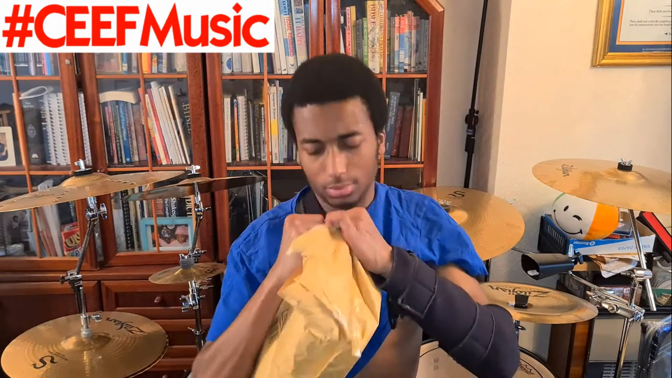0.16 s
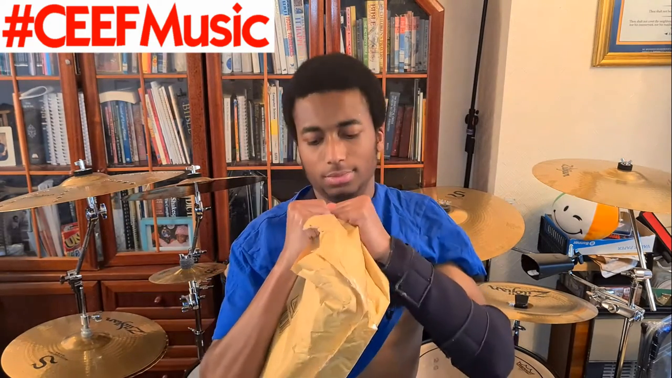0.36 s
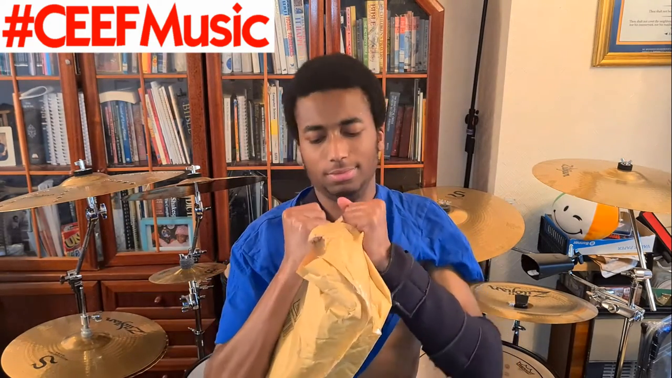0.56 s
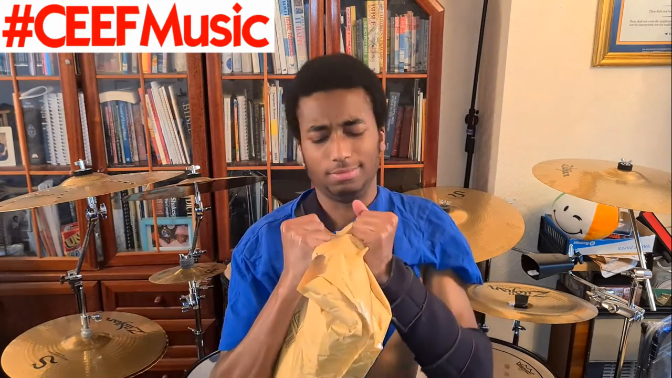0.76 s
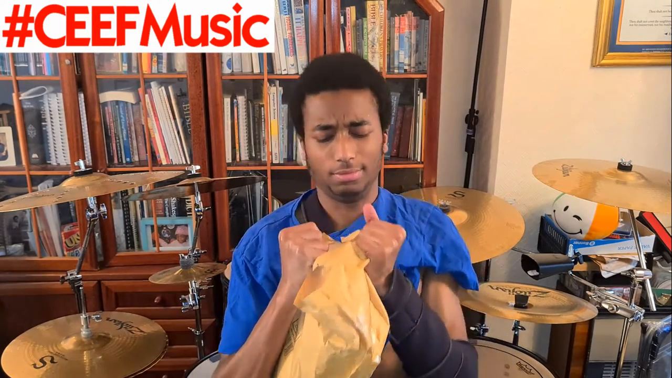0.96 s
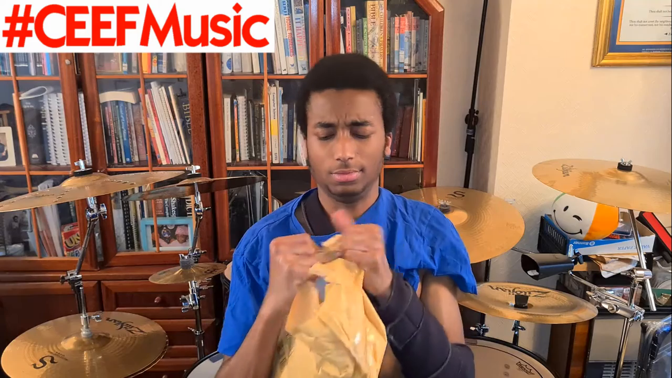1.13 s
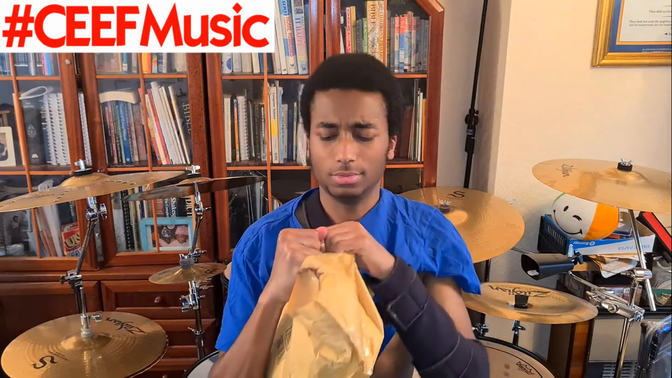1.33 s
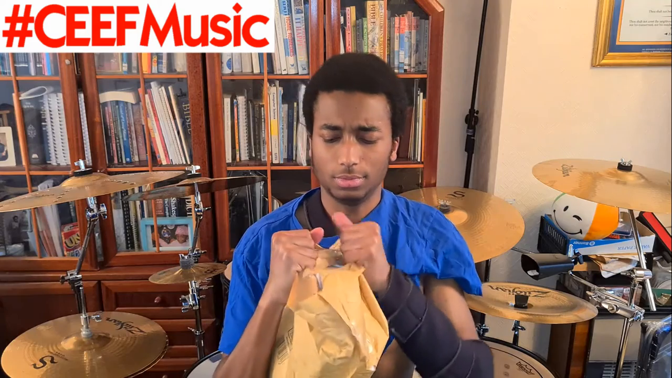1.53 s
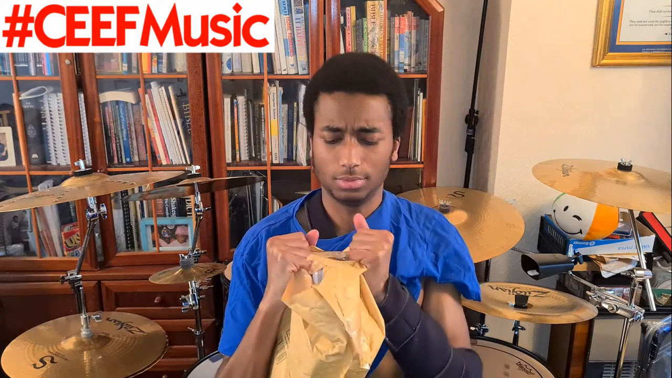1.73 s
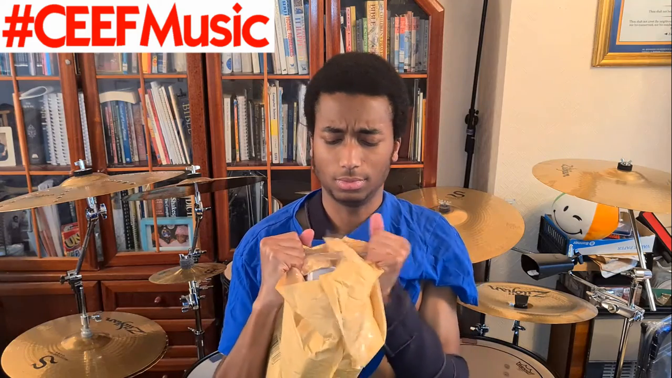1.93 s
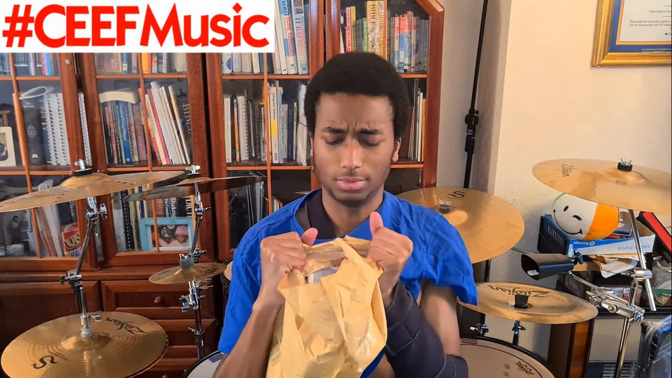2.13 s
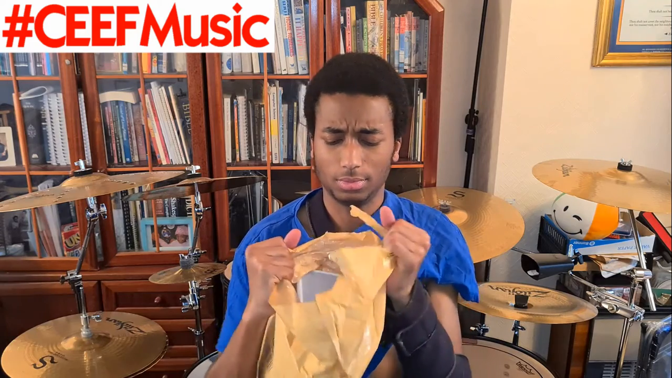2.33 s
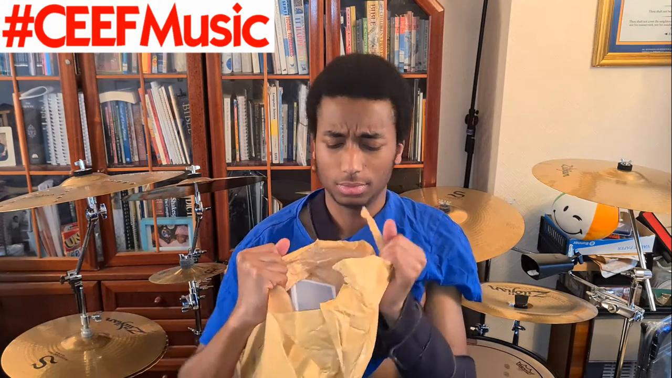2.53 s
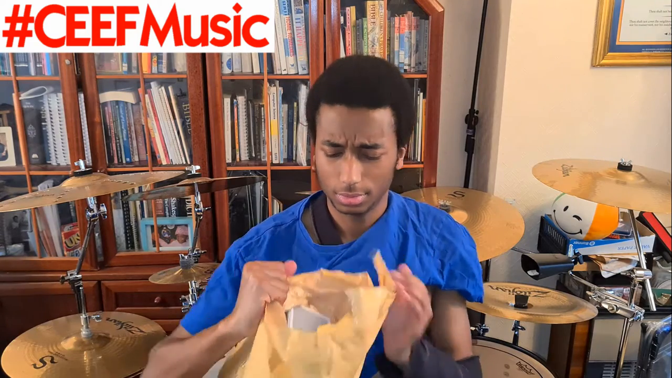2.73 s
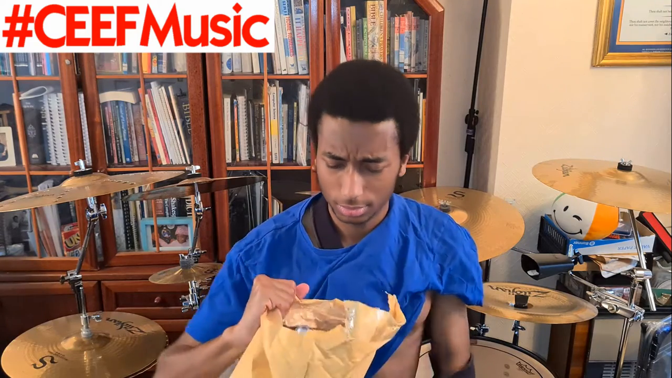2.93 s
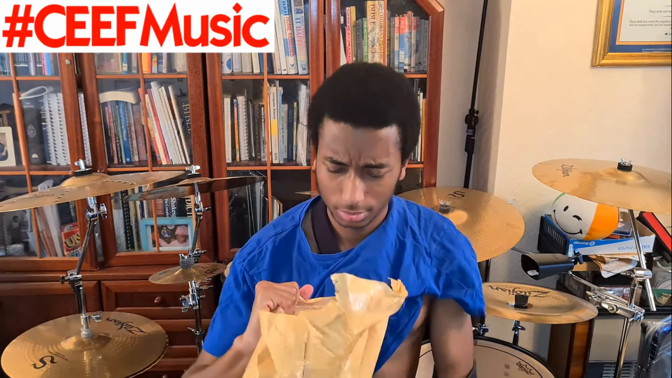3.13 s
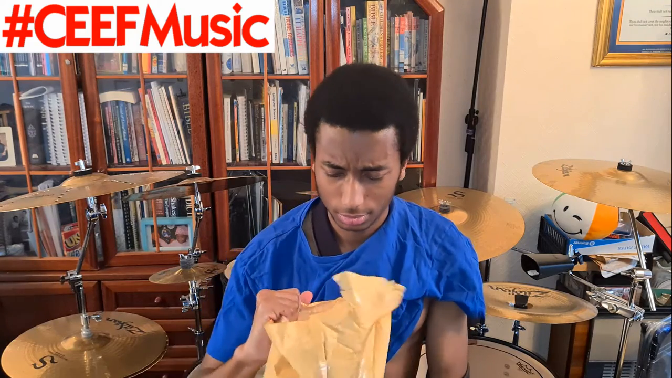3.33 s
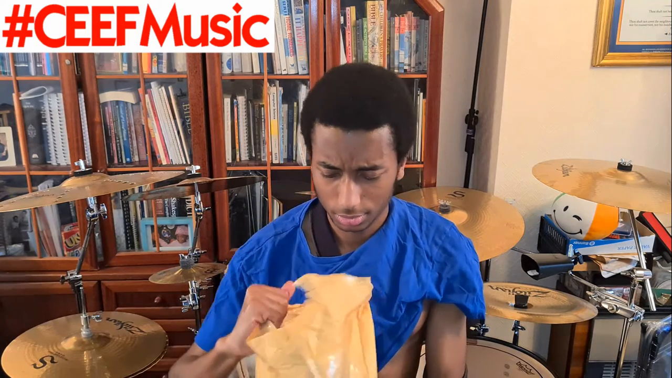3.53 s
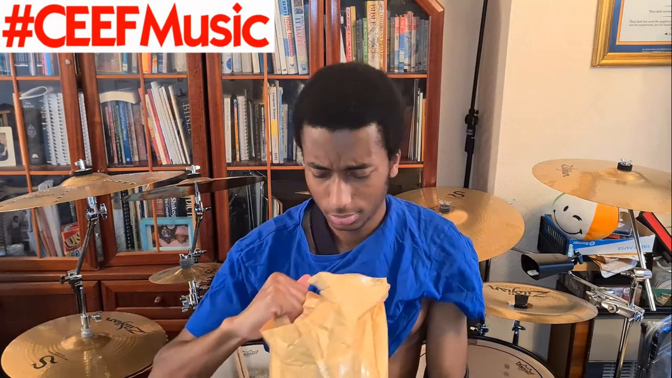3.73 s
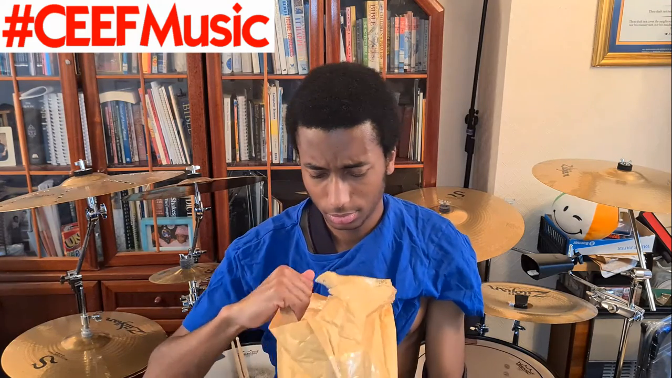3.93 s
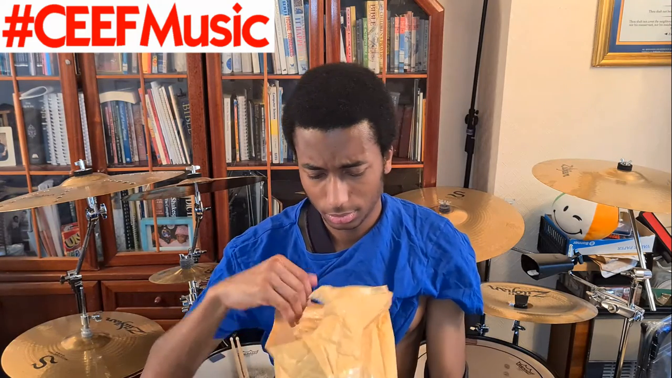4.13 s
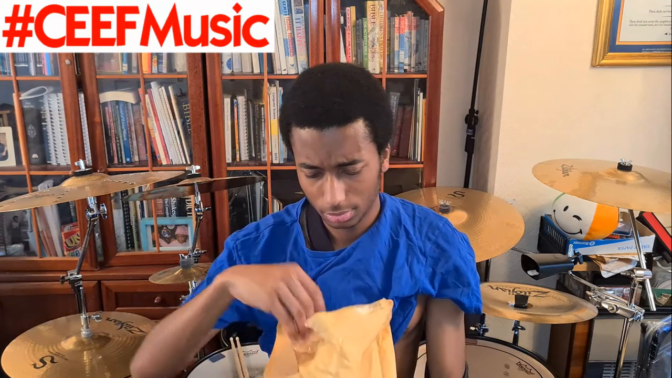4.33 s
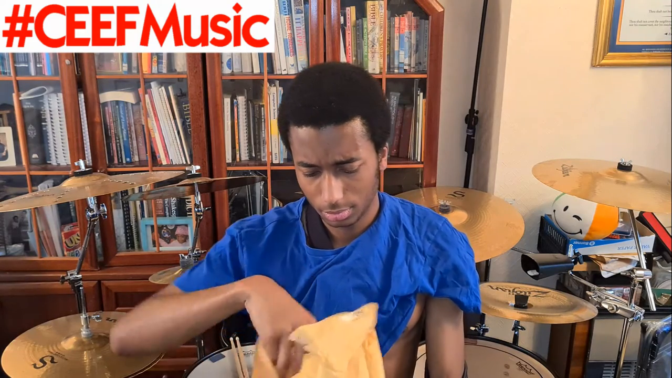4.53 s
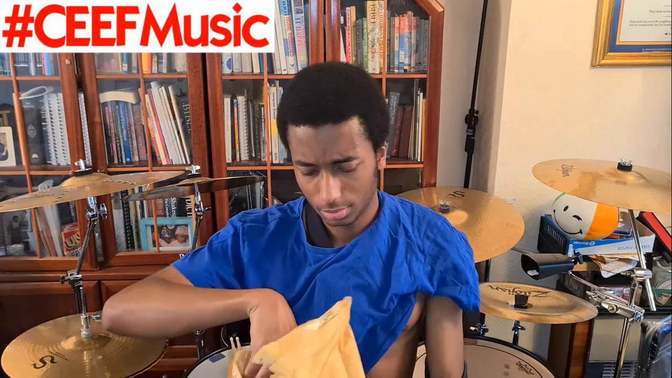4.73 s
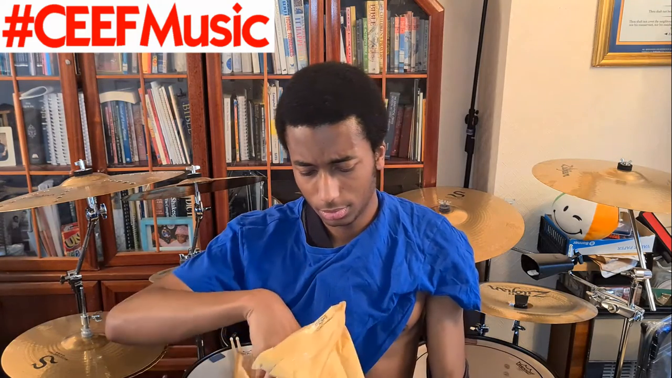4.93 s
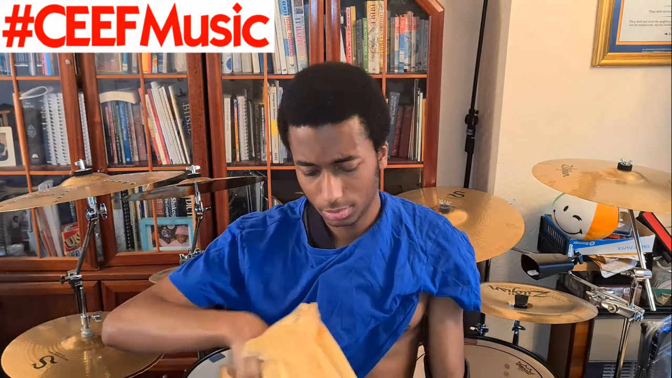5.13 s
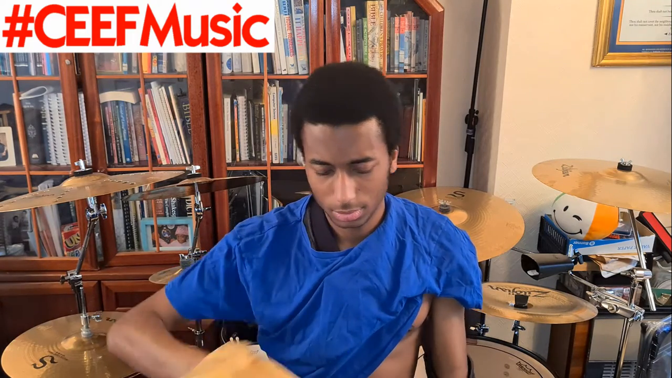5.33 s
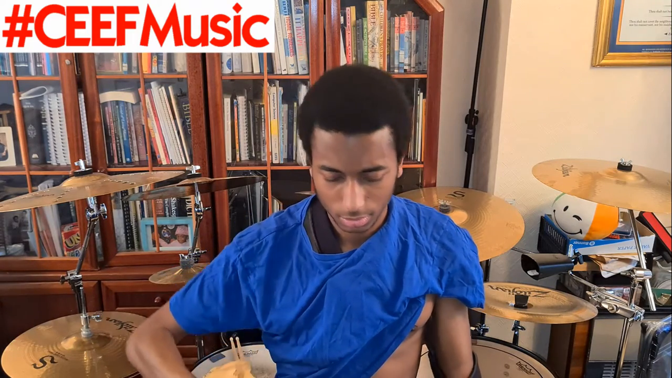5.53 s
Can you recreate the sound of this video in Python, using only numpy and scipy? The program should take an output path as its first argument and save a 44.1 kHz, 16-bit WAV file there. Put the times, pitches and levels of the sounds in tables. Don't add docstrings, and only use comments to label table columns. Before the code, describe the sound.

A padded paper envelope is torn open by hand in a damped, furnished room, heard in stereo from about a metre. The first 0.17 seconds are nearly silent, then the sound cuts in abruptly with crisp crinkling. From 0.2 to 1.0 seconds, tugs bring dense crackle, woody creases popping, fibre hiss and dull hollow thuds. After a short lull, harder pulls come around 1.2, 1.45 and 1.6 seconds, leading to the loudest ripping crack at about 1.94. Another strong burst follows at 2.2 to 2.4 as the bag opens, with a smaller one at 2.65. It goes almost quiet near 3 seconds. Looser rustles and small pops return from 3.2 to 3.8, then very faint rummaging, with a soft crinkle around 4.5 to 4.8. After near-quiet, a duller, low papery shuffle stirs from 5.3 to the end. Faint room hiss and low rumble lie underneath.

```python
import sys
import numpy as np
from scipy import signal
from scipy.fft import rfft, irfft, next_fast_len
from scipy.io import wavfile
from scipy.ndimage import uniform_filter1d

SR = 44100
rng = np.random.default_rng(int(sys.argv[2]) if len(sys.argv) > 2 else 0)


def transcribe(u):
    v = np.clip(np.atleast_2d(u).T, -1, 1)
    q = np.round(v * 32767).astype(np.int16)
    wavfile.write(sys.argv[1], SR, q)


def volts(x):
    e = np.asarray(x, float) / 20
    return 10 ** e


N = 246078
EVENT_N = 5000


def rms_one(x):
    return x / np.sqrt(np.mean(x ** 2) + 1e-20)


def drift(rate):
    knots = rng.standard_normal(200)
    return np.interp(np.arange(N) / SR * rate, np.arange(200), knots)


def colour(x, points, share=1):
    size = next_fast_len(N + 4096)
    hz, db = np.transpose(points)
    bin_hz = np.arange(size // 2 + 1) * SR / size
    gain = volts(share * np.interp(np.log(bin_hz + 1), np.log(hz), db))
    return irfft(rfft(x, size) * gain, size)[..., :N]


def band(x, low_hz, high_hz, order=2):
    return signal.sosfilt(signal.butter(order, [low_hz, high_hz], "band", fs=SR, output="sos"), x)


def peak_filter(hz, width):
    r = np.exp(-np.pi * width / SR)
    zeros = np.array([1, 0, -1]) * (1 - r * r) / 2
    return zeros, [1, -2 * r * np.cos(2 * np.pi * hz / SR), r * r]


def resonance(x, hz, width):
    return signal.lfilter(*peak_filter(hz, width), x)


def wandering(x, hz, width, size=256):
    out, state = np.zeros_like(x), np.zeros((2, 2))
    for i in range(0, N, size):
        zeros, poles = peak_filter(hz[i], width)
        out[:, i:i + size], state = signal.lfilter(zeros, poles, x[:, i:i + size], zi=state)
    return out


def buckles(per_s, spread_db, t60):
    struck = rng.random(N) < per_s / SR
    sizes = volts(2 * spread_db * np.minimum(rng.exponential(1, N), 4)) * struck
    power = signal.lfilter([1], [1, -volts(-120 / (t60 * SR))], sizes + 1e-9)
    return np.sqrt(power / uniform_filter1d(power, size=3000))


def swell(s, rise, fall):
    t = np.arange(0, N + 16, 16) / SR - s
    times = np.where(t < 0, -t / max(rise, .005), t / max(fall, .005))
    return np.repeat(volts(-40 * times), 16)[:N]


def kicks(table, click):
    noise = rng.standard_normal((len(table), 2, EVENT_N))
    noise[:, :, 0] = click * np.sign(noise[:, :, 0])
    return noise


def add(out, s, peak_db, sound):
    at = round(s * SR)
    out[:, at:at + EVENT_N] += volts(peak_db) * sound / np.abs(sound[0]).max()


def empty_events():
    return np.zeros((2, N + EVENT_N)), np.arange(EVENT_N) / SR


def handling():
    # over_sheet_db, share of the fibre level it follows
    layers = [(-6.5, -0.33), (-1, 0.0), (-5, 0.7579), (0, 1.0)]
    # time_s, sheet_db, fibre_share_db
    holding = [(0.17, -48.5, 7.5), (0.3, -45.5, -1.5), (0.9, -63, 1), (1.095, -80, -2), (1.35, -55, -7),
               (1.75, -49.5, 6.5), (2.07, -60.5, 7.5), (2.17, -57, 7.5), (2.55, -54, 4), (2.77, -60.5, 4),
               (3.14, -84, 4.5), (3.3, -47, -7.5), (3.72, -64, 5), (3.91, -63.5, 9), (4.12, -66, 9),
               (4.33, -69.5, 13), (4.85, -70.5, 12.5), (5.0, -75.5, 6.5), (5.29, -72, 6)]
    # peak_s, sheet_db, fibre_share_db,
    # rise_s, fall_s
    grips = [(0.171, -41.5, 7, .005, 0.067), (0.205, -32, -10, 0.027, 0.038),
             (0.381, -34, -4.5, 0.057, 0.34), (0.46, -37, 4, 0.062, 0.36), (0.5, -35.5, 6, 0.045, 0.15),
             (0.6, -37.5, -13, 0.12, 0.1), (0.665, -31.5, -3, 0.0094, 0.5), (0.75, -31, 3, 0.15, 0.11),
             (0.868, -41, 5.5, 0.031, 0.086), (0.936, -48, 11.5, 0.013, 0.13),
             (1.12, -41.5, -0.5, 0.026, 1), (1.201, -37, -0.5, 0.11, 0.17), (1.27, -46.5, -1, 0.23, 0.15),
             (1.409, -33.5, -3, 0.026, 0.14), (1.469, -28, -4.5, 0.065, 0.069),
             (1.572, -34, -3.5, 0.016, 0.033), (1.6, -44.5, 2.5, 0.024, 0.096),
             (1.651, -47, -5, 0.027, 0.14), (1.779, -38, 2.5, 0.032, 0.092), (1.871, -41, 14, 0.006, 0.074),
             (1.917, -35.5, -1.5, 0.035, 0.11), (1.942, -24.5, -3.5, 0.058, 0.086),
             (2.21, -42.5, 9.5, 0.05, 0.21), (2.274, -28, -1, 0.087, 0.042),
               (2.365, -36.5, -3.5, 0.018, 0.087), (2.48, -49, -6, 0.09, 0.21),
               (2.644, -37, -3, 0.072, 0.094), (2.97, -60.5, 9, 0.24, 0.26), (3.17, -54.5, 4, .015, 0.21),
               (3.209, -39, -11, 0.021, 0.083), (3.44, -45, -1.5, 0.27, 0.39),
               (3.59, -38.5, 1.5, 0.14, 0.13), (4.032, -47.5, -5, 0.06, 0.034), (4.4, -65, 15, 0.014, 0.51),
               (4.548, -42, -3.5, 0.038, 0.19), (4.65, -46.5, 4.5, 0.09, 0.2),
               (4.79, -51.5, 1, 0.035, 0.089), (5.356, -47, -3.5, 0.03, 0.18), (5.39, -38, -22, 0.09, 0.16),
               (5.47, -39.5, -14, 0.035, 0.24), (5.58, -39, -20, 0.096, .1)]
    held_s, *held_levels = np.transpose(holding)
    held_db, held_fibre_db = [np.interp(np.arange(N) / SR, held_s, level) for level in held_levels]
    moves = grips
    swells = np.array([swell(s, rise, fall) for s, db, fibre_db, rise, fall in moves])
    db, fibre_db = np.array(moves)[:, 1:3].T
    gains = []
    for over_db, share in layers:
        held_power = volts(held_db + share * held_fibre_db) ** 2
        moved_power = volts(db + share * fibre_db) ** 2 @ swells
        gains.append(volts(over_db) * np.sqrt(held_power + moved_power))
    return gains


def rustle():
    # pitch_hz, width_hz, level_db
    panels = [(307, 6.9, -17), (620, 460, -6), (1090, 400, -10), (1790, 100, -3.5), (2156, 61, -4),
              (2930, 51, -8.5)]
    # frequency_hz, density_db (per Hz)
    paper_colour = [(71, -57.5), (120, -10), (300, -9), (392, -11.5), (639, -6), (867, -14), (1090, -5),
                    (1500, -6), (1740, -3), (2000, -8), (3840, -4.5), (8520, -6.5), (15700, 3)]
    edges_hz = [130, 800, 2450, 7800, 19000]
    coarse = buckles(per_s=200, spread_db=4.0, t60=0.052)
    fine = buckles(per_s=660, spread_db=4.0, t60=0.13)
    noise = colour(rng.standard_normal((2, N)), paper_colour)
    ringing = 0
    for hz, width, db in panels:
        fold = np.tanh(drift(rate=16))
        pitch_hz = hz * (1 + .05 * fold[::-1])
        ringing = ringing + volts(db + 12.0 * fold) * wandering(noise * (0.43 + coarse), pitch_hz, width)
    out = 0
    for k, gain in enumerate(handling()):
        fine_share = [.1, .3, .6, .8][k]
        shaken = noise * (1.37 + (1 - fine_share) * coarse + fine_share * fine)
        shaken = shaken + 3.96 * ringing
        layer = band(shaken, edges_hz[k], edges_hz[k + 1], order=3)
        out = out + volts(-1.5) * gain * layer / np.std(layer[0])
    return out


def snaps():
    # start_s, peak_db, pitch_hz, crack_db (under the peak)
    tearing = [(0.203, -18, 920, -39), (0.233, -29, 1110, -27), (0.272, -22, 670, -21.5),
               (0.325, -23, 1670, -14.5), (0.374, -18, 1510, -13.5), (0.388, -12, 1090, -23),
               (0.423, -17, 2170, -32), (0.443, -23.5, 600, -9), (0.475, -19, 1960, -28),
               (0.492, -16, 1110, -32), (0.508, -13.5, 1810, -45), (0.569, -24.5, 665, -49),
               (0.599, -22, 1790, -23.5), (0.664, -14, 1670, -10), (0.702, -14, 1090, -14.5),
               (0.727, -24.5, 1110, -7), (0.74, -15, 1040, -16.5), (0.773, -11, 1210, -15.5),
               (0.873, -17, 1710, -15), (0.932, -16, 1620, -16.5)]
    # start_s, peak_db, pitch_hz, crack_db
    pulling = [(1.11, -42.5, 2240, -5), (1.137, -20, 1810, -55), (1.174, -18, 1790, -14),
               (1.195, -16, 1790, -8), (1.236, -24, 1790, -29), (1.328, -24.5, 1900, -31),
               (1.387, -36, 1130, -9), (1.401, -29, 1090, -12.5), (1.448, -14, 1720, -24),
               (1.456, -23, 633, -7), (1.465, -14, 2380, -10), (1.567, -13, 1790, -33),
               (1.588, -18.5, 1290, -8.5), (1.632, -25, 2530, -12), (1.649, -14.5, 2320, -17.5),
               (1.688, -17, 629, -32), (1.731, -38.5, 756, -26.5), (1.768, -28, 700, -25.5),
               (1.775, -23.5, 1884, -10), (1.796, -29, 1319, -9), (1.869, -16, 1720, -31.5),
               (1.914, -24, 2160, -7.5), (1.935, -8.5, 1790, -24), (1.949, -12, 1810, -13.5)]
    # start_s, peak_db, pitch_hz, crack_db
    opening = [(2.119, -43, 525, -11), (2.143, -40.5, 597, -13), (2.182, -47, 660, 2),
               (2.204, -18.5, 666, -25), (2.225, -30.5, 572, 2), (2.252, -20, 1040, -11),
               (2.271, -25, 1730, -28), (2.288, -20.5, 2370, -13), (2.359, -12.5, 1780, -45),
               (2.382, -20, 1800, -11), (2.467, -33.5, 1740, -28), (2.636, -19.5, 662, -40.5),
               (3.164, -48, 2010, -11), (3.204, -22.5, 630, -18.5), (3.259, -30.5, 654, -35.5),
               (3.303, -39, 800, -11), (3.373, -29.5, 2400, -10.5), (3.416, -37, 2060, -14),
               (3.488, -30.5, 650, -9), (3.511, -22.5, 1820, -24), (3.523, -24.5, 770, -31),
               (3.545, -30, 780, -30), (3.582, -24, 1320, -10), (3.675, -24.5, 1060, -36),
               (3.68, -29, 538, -47), (3.7, -33, 1530, -25), (3.767, -38.5, 545, -34),
               (3.803, -45, 544, -6), (3.877, -34, 584, -34)]
    # start_s, peak_db, pitch_hz, crack_db
    rummaging = [(4.002, -34, 690, -12), (4.029, -32.5, 1790, -10), (4.375, -64.5, 540, 8.5),
                 (4.466, -54.5, 1310, -5), (4.481, -40, 530, -24), (4.544, -23, 1234, -13),
                 (4.597, -28.5, 1140, -12.5), (4.646, -29, 2060, -8), (4.786, -33.5, 1187, -31),
                 (4.811, -46.5, 2090, -2), (5.35, -40, 590, -30), (5.38, -21.5, 620, -24),
                 (5.39, -30, 865, -41), (5.411, -29, 650, -32), (5.461, -24, 2047, -24),
                 (5.544, -23.5, 1530, -24), (5.567, -26.5, 430, -31)]
    crack_top_db = [2, -8, -5.5, -9]
    snap_t60_s = [.028, .03, .035, .035]
    tick_share = [0.36, 0.32, 0.1, 0.17]
    out, t = empty_events()
    stages = zip([tearing, pulling, opening, rummaging], crack_top_db, snap_t60_s, tick_share)
    for table, top_db, t60, share in stages:
        for (s, peak_db, hz, crack_db), n in zip(table, kicks(table, click=3.3)):
            burst = n * volts(-60 * t / t60)
            tick = band(n * volts(-60 * t / (0.5 * t60)), 450, 1700)
            pop = resonance(burst, hz, 0.099 * hz) + share * tick
            add(out, s, peak_db - 6.0, band(pop, 0.51 * hz, 2.3 * hz))
            crack_decay = volts(-60 * t / (0.17 * t60)) + 0.27 * volts(-60 * t / (5.5 * t60))
            crack = np.roll(n, -1, axis=1) * crack_decay
            add(out, s, peak_db + crack_db + 7.5, band(crack, 2150, 5430))
            add(out, s, peak_db + crack_db + top_db + 14.0, band(crack, 7100, 22000))
    return out[:, :N]


def clicks():
    # start_s, peak_db,
    # centre_hz
    bundles = [(0.3738, -14, 1720), (0.3873, -23, 1090), (0.4222, -20, 2180), (0.4512, -12.5, 1200),
               (0.4781, -14.5, 2120), (0.4931, -18, 1100), (0.5749, -26, 1760), (0.6093, -31, 1790),
               (0.6627, -8.5, 1690), (0.7006, -24, 1090), (0.7729, -10, 1670), (0.8303, -31, 1750),
               (0.8577, -26, 1800), (0.8722, -26, 1770), (0.9306, -29, 1500),
               (1.3876, -26, 1090), (1.4495, -13, 1700), (1.4578, -8, 1120), (1.4643, -6.5, 1700),
            (1.5662, -26, 1690), (1.5884, -16, 1700), (1.6327, -15, 2300), (1.6501, -17, 2320),
            (1.6883, -36, 999), (1.7739, -31, 3450), (1.775, -26, 1850), (1.795, -23.5, 1300),
            (1.869, -30.5, 1800), (1.9136, -17, 2200), (1.9345, -16, 1790), (2.0942, -38, 1110),
            (2.1412, -41.5, 1710), (2.173, -45, 1100), (2.203, -22, 1760), (2.2246, -20, 2820),
            (2.2367, -22, 1120), (2.3585, -21, 1690),
               (3.2598, -38, 1050), (3.3055, -34, 1350), (3.3556, -29, 1890), (3.3727, -24, 2380),
              (3.418, -39, 2590), (3.424, -25, 1860), (3.512, -38, 1860), (3.5774, -29, 1870),
              (3.583, -40, 1290), (3.6766, -26, 1060)]
    out, t = empty_events()
    table = bundles
    for (s, peak_db, hz), n in zip(table, kicks(table, click=3.0)):
        crack = n * [[1], [.6]] * volts(-60 * t / .011)
        add(out, s, peak_db - 7.5, band(crack, 0.21 * hz, 1.8 * hz))
    return out[:, :N]


def ticks():
    # start_s, peak_db
    partings = [(0.234, -22), (0.443, -34), (1.197, -11.5), (1.87, -23), (2.141, -33), (4.545, -28.5),
                (4.786, -31), (4.867, -45), (5.017, -47)]
    out, t = empty_events()
    for (s, peak_db), n in zip(partings, kicks(partings, click=5.0)):
        add(out, s, peak_db, band(n * volts(-60 * t / 0.021), 6600, 19000))
    return out[:, :N]


def pops():
    # start_s, peak_db, pitch_hz, t60_s
    folds = [(0.355, -33.5, 6400, 0.013), (0.444, -30, 5200, 0.02), (0.575, -36, 2700, 0.022),
             (1.019, -47.5, 1820, 0.014), (1.213, -26.5, 1770, 0.06), (1.555, -35, 4500, 0.013),
             (1.912, -21, 1710, 0.039), (1.963, -25, 1640, 0.043), (1.972, -34, 1770, 0.018),
             (2.237, -29.5, 4170, 0.025), (2.261, -31, 1850, 0.019), (2.293, -38, 2920, 0.025),
             (2.49, -43.5, 1210, 0.022), (4.646, -29, 2100, .014), (3.17, -48, 3950, 0.029),
             (3.224, -43, 694, 0.024), (3.278, -42, 390, 0.023), (3.375, -37, 2870, 0.063),
             (3.425, -37, 1760, 0.025), (3.44, -38, 2050, 0.025), (3.455, -47, 1810, .03),
             (3.47, -38, 1900, .03), (3.511, -31.5, 2980, .03), (3.562, -37, 755, .03),
             (3.578, -37.5, 600, 0.048), (3.6, -40, 1250, 0.034), (3.655, -49, 606, 0.02),
             (4.03, -40.5, 4800, 0.021), (4.437, -61, 3170, 0.038), (4.505, -45, 680, 0.081),
             (4.575, -40, 690, 0.025), (4.646, -33, 4300, .015), (4.724, -48, 1270, 0.044),
             (4.795, -50, 480, 0.029), (5.251, -55, 1880, 0.062), (5.315, -49, 556, .05),
             (5.338, -47, 2600, .04), (5.385, -35, 2140, 0.054), (5.468, -38, 2090, .03),
             (5.544, -44.5, 3400, .03), (5.546, -33, 2060, 0.017), (1.456, -15.5, 610, 0.0099),
             (5.381, -29, 710, 0.016), (5.329, -47, 1200, 0.066), (5.499, -37, 890, 0.052),
             (3.886, -51, 380, .03), (0.932, -30, 796, 0.023), (1.795, -40, 1130, 0.029),
             (5.29, -51, 218, 0.079),
             (0.61, -28.5, 1800, .015),
        (1.774, -27, 1904, 0.012),
        (1.9354, -13, 1800, 0.025),
        (1.9415, -19, 547, .015),
        (4.03, -41, 470, .025),
    ]
    out, t = empty_events()
    table = folds
    for (s, peak_db, hz, t60), n in zip(table, kicks(table, click=2.5)):
        burst = n * np.minimum(t / .0012, 1) * volts(-60 * t / t60)
        add(out, s, peak_db, resonance(resonance(burst, hz, 0.14 * hz), hz, 0.87 * hz))
    return out[:, :N]


def thumps():
    # start_s, peak_db, pitch_hz
    blows = [(0.506, -28.5, 315), (0.665, -22, 436), (0.736, -21.5, 307), (0.867, -34, 306),
             (1.461, -26.5, 337), (1.69, -33.5, 303), (1.871, -31.5, 313), (1.9347, -14, 298),
             (2.248, -42, 145), (2.633, -34.5, 208), (3.197, -35, 205), (3.59, -29.5, 313),
             (4.006, -47.5, 150), (4.6, -34, 205), (5.409, -33, 180), (5.464, -36, 161)]
    out, t = empty_events()
    for (s, peak_db, hz), n in zip(blows, kicks(blows, click=9.9)):
        boom = resonance(n * volts(-60 * t / 0.033), hz, 0.13 * hz)
        add(out, s, peak_db - 6.5, resonance(boom, hz, 1.0 * hz))
    return out[:, :N]


def lining():
    # peak_s, level_db, rise_s, fall_s
    peels = [(0.445, -30.5, .005, 0.27), (0.603, -34.5, .005, 0.067), (0.832, -35.5, .005, 0.36),
             (1.106, -45, .005, 0.11), (1.734, -41, .005, .04), (1.776, -32.5, .005, 0.036),
             (1.915, -24, .005, 0.071), (2.122, -44, .005, 0.037), (2.488, -56, .005, .05),
             (3.29, -59, .005, .05), (3.552, -45, .01, 0.054), (3.785, -61, .02, .04),
             (3.826, -55, .005, 0.056), (3.9, -65, 0.018, 0.056), (4.0, -70, 0.029, 0.044),
             (4.215, -55, 0.033, 0.062), (4.39, -60.5, 0.023, 0.074), (4.11, -69, .05, 0.069),
             (4.46, -57, .06, .08), (4.868, -45, .005, 0.0083), (5.12, -64, .15, .12)]
    grain = buckles(per_s=580, spread_db=5.5, t60=.02)
    hiss = rms_one(band(rng.standard_normal((2, N)) * (1.5 + grain), 10300, 18000, order=3))
    return hiss * np.sqrt(sum(volts(db) ** 2 * swell(s, rise, fall) for s, db, rise, fall in peels))


def slides():
    # start_s, end_s, pitch_hz, width_hz, level_db
    strokes = [
        (4.38, 4.58, 580, 96, -66),
        (4.45, 4.57, 1260, 98, -55.5),
        (4.42, 4.56, 3100, 79, -61.5),
        (2.24, 2.31, 2880, 170, -35),
        (1.685, 1.72, 820, 170, -44),
        (3.41, 3.49, 2160, 710, -47),
        (3.5, 3.86, 2200, 160, -67),
        (5.40, 5.50, 130, 100, -48),
    ]
    out, t = 0, np.arange(N) / SR
    for start, end, hz, width, db in strokes:
        stroke_power = np.sin(np.pi * np.clip((t - start) / (end - start), 0, 1)).clip(0)
        rub = rms_one(resonance(rng.standard_normal((2, N)), hz, width))
        out = out + volts(db) * np.sqrt(stroke_power) * rub
    return out


def room(x):
    t = np.arange(int(.4 * SR)) / SR
    t60_s = 0.16
    tail = rng.standard_normal((2, len(t))) * volts(-60 * t / t60_s) * (t > .004)
    tail = signal.lfilter([.6], [1, -.4], tail)
    return signal.fftconvolve(x, tail / np.sqrt(np.sum(tail[0] ** 2)), axes=1)[:, :N]


def rumble():
    # peak_s, level_db
    jolts = [
        (0.5, -52.5),
        (0.72, -48.5),
        (0.93, -56),
        (1.96, -41),
        (2.26, -65),
        (3.25, -50.5),
        (3.609, -48),
        (5.42, -60),
    ]
    rise_s, fall_s, steady_db = 0.059, 0.071, -73.5
    noise = rms_one(band(rng.standard_normal((2, N)), 28, 120))
    noise = noise * [[1], [.4]] * volts(2.3 * drift(rate=8.4))
    power = volts(steady_db) ** 2 + sum(volts(db) ** 2 * swell(s, rise_s, fall_s) for s, db in jolts)
    return volts(-5.5) * np.sqrt(power) * noise


def room_tone():
    # pitch_hz, width_hz, level_db
    house_hum = [(46, 2.8, -72.5), (83, 5.3, -76), (205, 6.9, -78.5)]
    # frequency_hz, density_db (per Hz)
    tone_colour = [(15, -33.5), (25, -7), (96, -13.5), (113, -15.5), (205, -2.5), (391, -20), (670, -20),
                   (926, -37), (1210, -25.5), (1770, -20), (2140, -19.5), (2380, -32.5), (3030, -21),
                   (7300, -14.5), (7900, -28), (9800, -24), (11500, -17.5), (15700, -21.5)]
    edges_hz = [10, 700, 1500, 2500, 3300, 4300, 5800, 7500, 9000, 11000, 20000]
    white = rng.standard_normal((2, N))
    hums = sum(volts(db) * rms_one(resonance(white, hz, width)) for hz, width, db in house_hum)
    together = drift(rate=15)
    steady = colour(rng.standard_normal((2, N)), tone_colour)
    hiss = 0
    for low, high in zip(edges_hz, edges_hz[1:]):
        hiss = hiss + volts(2.5 * drift(rate=33)) * band(steady, low, high)
    return volts(-68.5 + 4 * together) * rms_one(hiss) + hums


def scene():
    # frequency_hz, side_minus_mid_db
    width = [(60, -6.5), (150, -11), (380, -10.5), (950, -7), (2380, -5.5), (5980, 1.5), (15000, -1)]
    # frequency_hz, left_minus_right_db
    lean = [(60, 1.5), (180, -1.5), (550, 0), (1650, 1.5), (4970, 0.5), (15000, 2)]
    paper = rustle() + snaps() + clicks() + ticks() + pops() + thumps() + lining() + slides()
    mid, side = paper + volts(-11.5) * room(paper) + rumble() + room_tone()
    side = colour(side, width)
    left = colour(mid + side, lean, share=0.085)
    right = np.roll(colour(mid - side, lean, share=-0.81), 2)
    heard = np.array([left, right])
    hum = volts(-87.5) * rms_one(band(rng.standard_normal(N), 38, 240))
    cut_in = np.clip((np.arange(N) / SR - 0.17) / 0.0018, 0, 1)
    return heard * cut_in + hum * (1 - cut_in)


def roll_off(x):
    return signal.sosfilt(signal.butter(12, 16990, fs=SR, output="sos"), x)


def record(dry):
    # frequency_hz, gain_db
    microphone = [(4500, 0), (6900, 1), (7600, -3.5), (8500, -4), (10300, -3.5), (11500, -1), (13000, -5),
                  (15400, -3)]
    # frequency_hz, gain_db
    top_cut = [(15740, 0), (15870, -50), (16800, -52), (17000, -80)]
    mix = colour(colour(dry, microphone), top_cut)
    return roll_off(mix)


dry = scene()
out = record(dry)
transcribe(out)
```